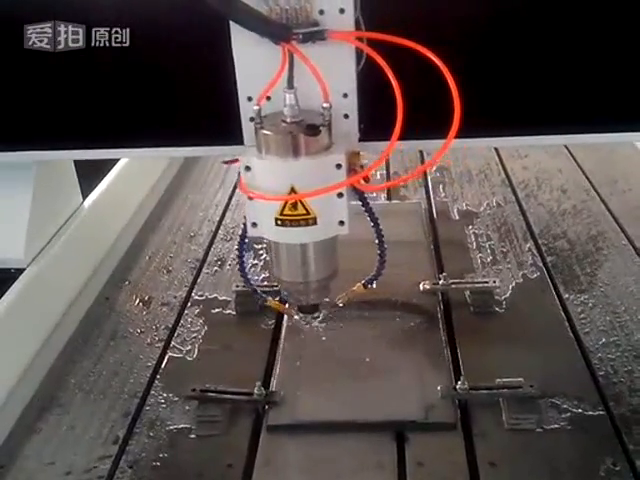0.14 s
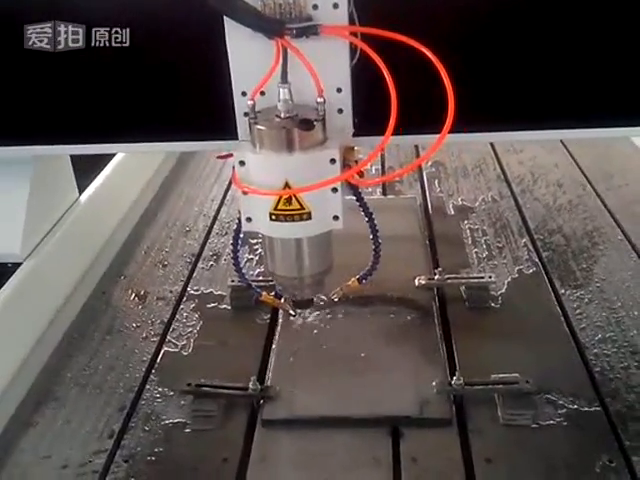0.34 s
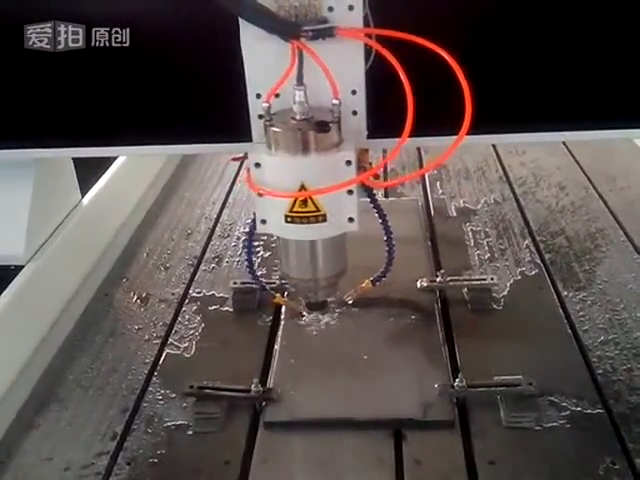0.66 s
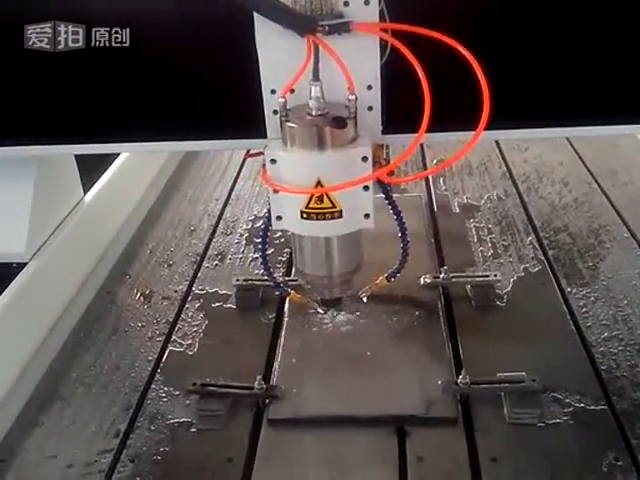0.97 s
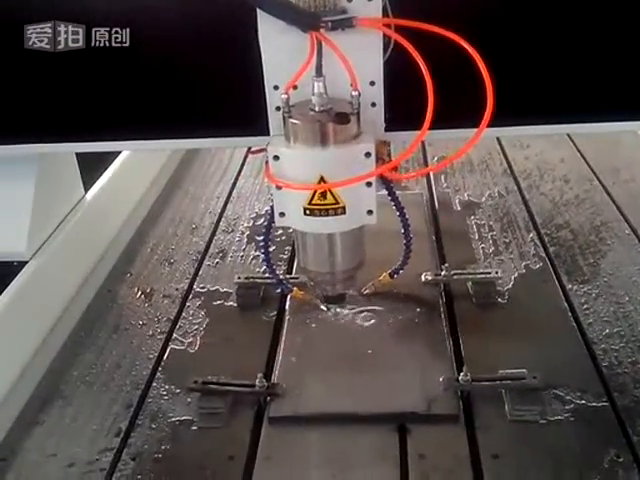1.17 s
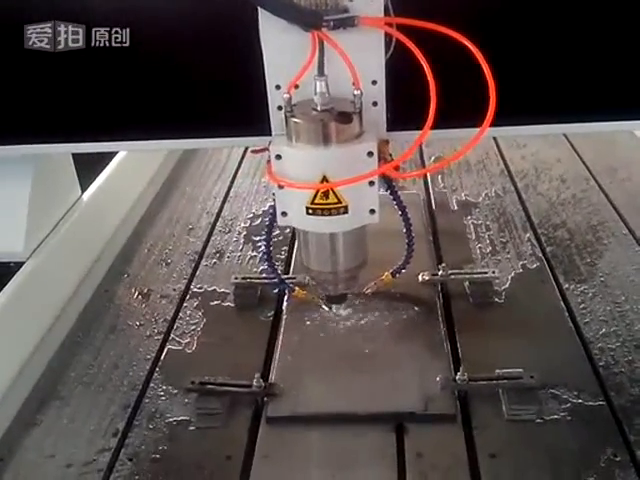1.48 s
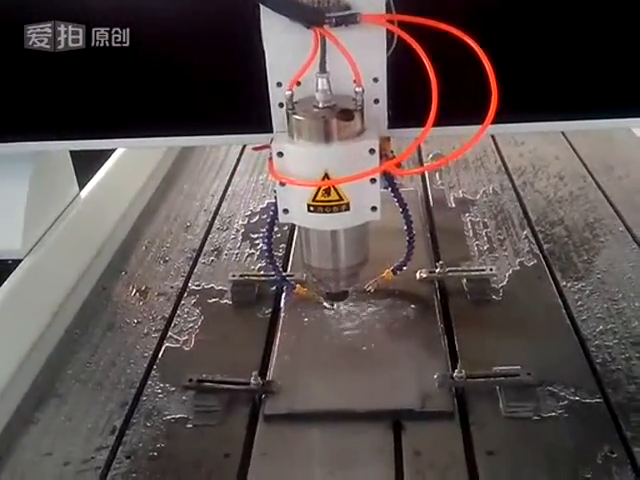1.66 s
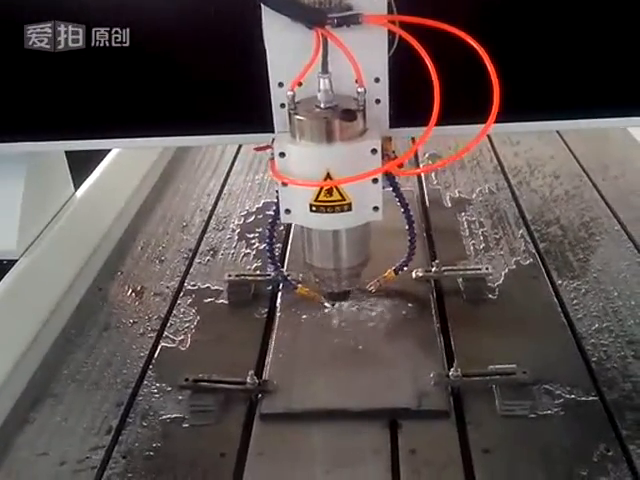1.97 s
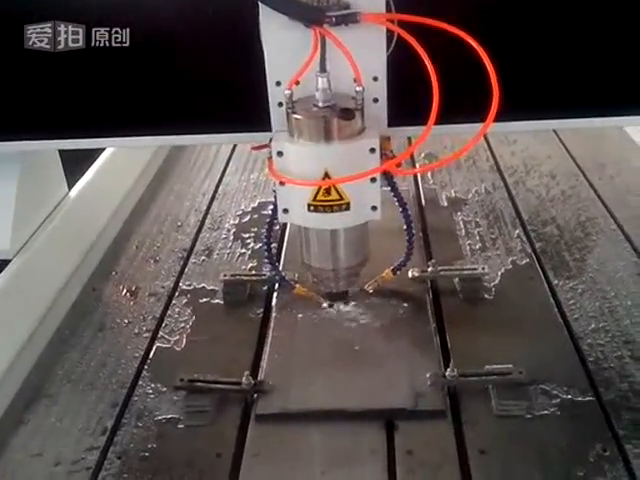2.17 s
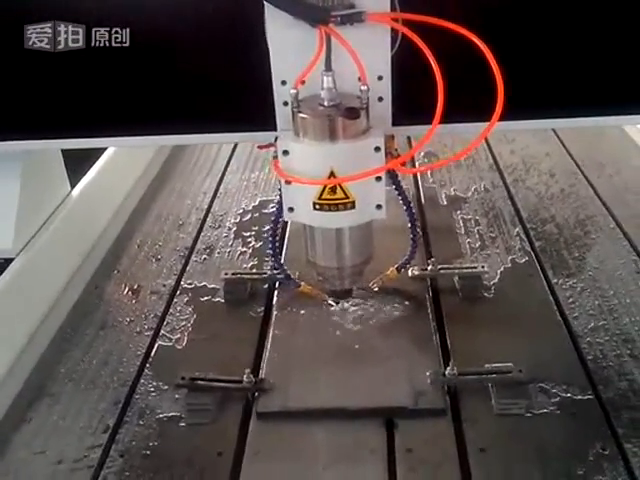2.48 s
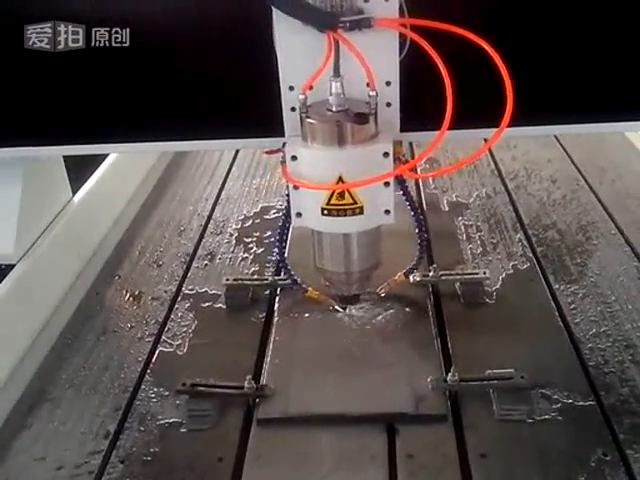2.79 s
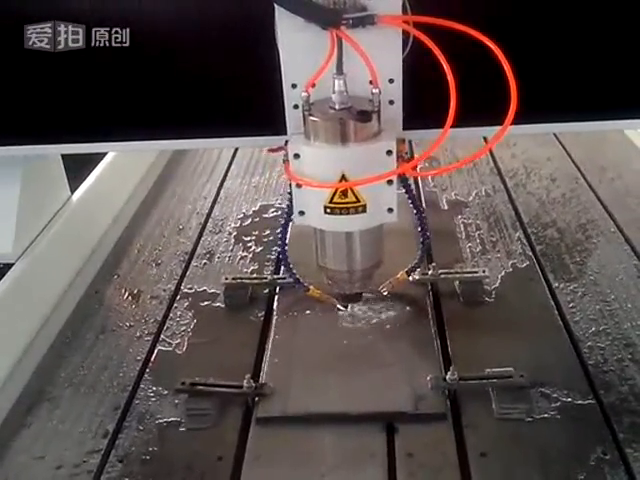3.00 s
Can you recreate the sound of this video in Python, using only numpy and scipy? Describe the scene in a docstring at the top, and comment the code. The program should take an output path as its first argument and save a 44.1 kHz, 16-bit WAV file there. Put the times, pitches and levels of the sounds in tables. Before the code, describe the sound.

A spinning machine bit hums and whines through wet stone, screeching briefly over hissing coolant.

```python
"""A router spindle turns about 300 times a second, grinding a wet stone slab in a workshop.
Its hum and whine are shaft orders that swell and fade as the head travels. The bit grinds
hardest once a turn and now and then catches and screeches.
Coolant jets hiss and a pump rumbles behind."""
import sys
import numpy as np
from scipy import signal
from scipy.fft import rfft, irfft, next_fast_len
from scipy.io import wavfile
from scipy.ndimage import uniform_filter1d, map_coordinates

SR = 44100
rng = np.random.default_rng(int(sys.argv[2]) if len(sys.argv) > 2 else 0)


def to_wav(sig):
    """Store sig (one row per channel, or 1-D mono) as 16-bit WAV at the path in sys.argv[1].

    Samples outside -1..1 are clipped; the rate is SR.
    """
    pcm = np.clip(np.atleast_2d(sig), -1, 1) * 32767
    pcm = np.round(pcm).astype(np.int16)
    wavfile.write(sys.argv[1], SR, pcm.T)  # frames by channels


N = 138474

SHAFT_HZ, FLUTTER_HZ = 299.85, 22
WANDER_RAD = 0.35  # phase drift, times sqrt(order)
HEAD_PAN_DB, LEFT_LAG_S = -3.5, 0.000233  # every pan is left minus right


def hum(shaft):
    """Shaft orders 1-7 swell, waver and drop out; the sixth swings sideways as the head travels."""
    # level of each order: t/s, level/dB
    order_1 = [(0.2, -26.5), (0.86, -29.5), (0.98, -26.5), (1.25, -26.5), (1.55, -33), (1.66, -44.5),
               (1.82, -29), (1.89, -35), (2.36, -30.5), (2.45, -25.5), (2.57, -27.5), (2.71, -42.5),
               (2.89, -23.5), (2.98, -30), (3.02, -42.5), (3.13, -27)]
    order_2 = [(0, -61), (.2, -40.5), (.39, -41.5), (.5, -60.5), (.79, -48), (.87, -35.5), (1.22, -35.5),
               (1.36, -54.5), (1.681, -46), (1.77, -57.5), (2.13, -42), (2.52, -41.5), (2.8, -51),
               (2.9, -45)]
    order_3 = [(0, -25.5), (.13, -33.5), (.23, -27.5), (.68, -30), (.725, -24.5), (.78, -31.5), (1.04, -26),
               (1.35, -30), (1.51, -37), (1.57, -32), (1.63, -43.5), (1.76, -25.5), (1.86, -37.5),
               (1.97, -28.5), (2.345, -29.5), (2.364, -39.5), (2.69, -46), (2.77, -32), (2.92, -46)]
    order_4 = [(0, -42), (.46, -33.5), (.66, -48), (1, -43.5), (1.4, -42.5), (1.66, -55.5), (1.74, -40),
               (2.3, -43.5), (2.6, -32), (2.7, -40.5)]
    order_5 = [(0.76, -47.5), (1.12, -36.5), (1.75, -52.5), (2.35, -51.5), (2.4, -38), (2.5, -33),
               (2.56, -49)]
    order_6 = [(0.01, -27), (.07, -45), (.17, -30), (.62, -31.5), (.79, -38), (.86, -28.5), (1.101, -30.5),
               (1.45, -33), (1.63, -36), (1.77, -32), (1.85, -39), (1.96, -29.5), (2.25, -36.5),
               (2.47, -24), (2.659, -32), (2.78, -26.5), (2.87, -30.5)]
    order_7 = [(0, -50.5), (.29, -30), (.36, -33), (.74, -38), (.8, -54), (1, -37), (1.3, -35.5),
               (1.67, -44.5), (2.7, -44), (2.77, -34.5), (2.83, -42)]
    # direction of each order: pan/dB, left lag/rad
    places = [(-4, 0.13), (-4, 0.97), (-13, 1.34), (-9.5, 1.4), (21, 1.4), (-5.5, 2.62), (10, 0.7)]
    # swing of order 6: t/s, added pan/dB
    swing = [(.75, 1), (.87, -16), (1.1, 0.5), (1.6, 2.5), (1.77, -12), (1.9, 7), (2.35, -6.5), (2.6, 18),
             (2.72, -4), (3, 5)]
    # brief dips: t/s, order
    dropouts = [(.645, 3), (.79, 6), (.905, 3), (1.71, 6), (2.065, 3), (2.57, 2), (2.73, 4)]
    trim_db, dip_db, dip_s, flutter_depth = 0.5, 11.5, 0.015, 0.075
    out, t = np.zeros((2, N)), np.arange(N) / SR
    levels = [order_1, order_2, order_3, order_4, order_5, order_6, order_7]
    for k, (level, (pan_db, lag_rad)) in enumerate(zip(levels, places), 1):
        dips = sum(np.exp(-((t - at_s) / dip_s) ** 2) for at_s, order in dropouts if order == k)
        flutter = 1 + flutter_depth * np.sqrt(k) * (wobble(FLUTTER_HZ) + 1j * wobble(FLUTTER_HZ))
        gain = amp(curve(level) + trim_db - dip_db * dips) * np.abs(flutter)
        phase = k * shaft + rng.uniform(0, 2 * np.pi) + np.angle(flutter)
        phase += WANDER_RAD * np.sqrt(k) * wobble(1.994)
        swing_db = curve(swing) * (k == 6)
        out += gain * pan(pan_db + swing_db) * np.sqrt(2) * np.cos([phase - lag_rad, phase])
    return out


def whine(shaft):
    """Shaft orders 8-24, each swelling and blurring on its own; now and then one sings out."""
    # common envelope: t/s, level/dB
    level = [(0, -43.5), (.4, -37.5), (.8, -46), (1.3, -35.5), (1.52, -45.5), (2.25, -44.5), (2.45, -32.5),
             (2.65, -44.5)]
    # spectrum: f/Hz, level/dB
    colour = [(2400, -5), (2700, -11), (4200, 2.5), (5500, -5), (6600, 3)]
    # orders that sing out: start/s, end/s, order, level/dB
    singing = [(.15, .7, 8, -44), (.24, .6, 16, -41), (.9, 1.46, 12, -41.5), (.98, 1.46, 15, -39)]
    trim_db, flutter_db, blur_rad, ramp_s = -7.5, 2, 0.25, 0.033
    out, t = np.zeros((2, N)), np.arange(N) / SR
    for k in range(8, 25):
        hz = k * SHAFT_HZ
        phase = k * shaft + rng.uniform(0, 2 * np.pi) + blur_rad * wobble(40)
        phase += WANDER_RAD * np.sqrt(k) * wobble(2)
        gain = amp(curve(level) + along(colour, hz) + trim_db)
        for start_s, end_s, order, db in singing:
            if order == k:
                gain += amp(db) * np.clip(np.minimum(t - start_s, end_s - t) / ramp_s, 0, 1)
        gain *= amp(flutter_db * wobble(FLUTTER_HZ))
        out += gain * np.cos([phase - 2 * np.pi * hz * LEFT_LAG_S, phase])
    return out * pan(HEAD_PAN_DB)


def grinding(shaft):
    """Gritty noise and the narrow ringing of head and bit, all following the load."""
    # how hard the bit grinds: t/s, level/dB
    load = [(0.06, -33), (0.29, -26), (0.81, -30.5), (1.35, -27.5), (1.59, -32), (2.3, -30), (2.47, -27),
            (2.66, -35.5), (2.71, -30)]
    # grit spectrum: f/Hz, relative density/dB
    spectrum = [(400, -8.5), (750, -7), (950, 5.5), (1100, -2.5), (1350, 1.5), (1620, -3), (1800, -7),
                (2060, 6), (2280, -3), (2750, -8), (3400, -7), (4300, 3), (5500, -9), (7000, -5.5)]
    # grit direction: f/Hz, pan/dB
    direction = [(800, -1.5), (1500, 6), (2200, 0), (3000, -13)]
    # head and bit resonances: f/Hz, width/Hz, relative level/dB
    rings = [(1815, 68, -11.5), (4215, 43, -12)]
    trim_db = -1
    grit = patchy(noise(lambda hz: amp(along(spectrum, hz)), lambda hz: along(direction, hz)))
    out = grit * bite(shaft, depth=0.43, grit_db=2) * amp(trim_db)
    for ring_hz, width_hz, db in rings:
        out += amp(db) * noise(resonance(ring_hz, width_hz), lambda hz: HEAD_PAN_DB)
    return out * amp(curve(load))


def screeches(shaft):
    """Each catch swells in one resonance, struck again every turn and so split into shaft orders."""
    # catches of the bit: peak t/s, length/s, level/dB, f/Hz, width/Hz
    catches = [(0.298, 0.12, -30, 4010, 482), (0.53, 0.12, -30.5, 4660, 330),
               (.695, 0.066, -30.5, 4410, 282), (0.748, 0.04, -24.5, 6760, 246),
               (0.743, 0.054, -33.5, 4940, 217), (0.908, .06, -24, 4400, 433),
               (0.98, 0.06, -24.5, 4460, 325), (1.324, 0.18, -29.5, 7080, 442),
               (1.334, 0.036, -29, 4430, 1320), (1.666, 0.06, -32, 4230, 220), (2.347, .11, -22, 5150, 750),
               (2.379, 0.053, -24.5, 4370, 410), (2.465, 0.16, -26.5, 5100, 602),
               (2.611, 0.045, -26, 6640, 697), (2.697, .075, -25, 4220, 130),
               (3.026, 0.023, -27.5, 6950, 362)]
    # direction by pitch: f/Hz, pan/dB
    direction = [(4600, -13), (5200, -2.5)]
    turn_echo = 0.78  # share repeated on the next turn
    out, t = np.zeros((2, N)), np.arange(N) / SR
    for peak_s, length_s, db, pitch_hz, width_hz in catches:
        near = np.abs(t - peak_s) < 2 * length_s
        swell = amp(db) / np.cosh(2 * (t[near] - peak_s) / length_s) ** 2
        mode = resonance(pitch_hz, width_hz)
        comb = lambda hz: mode(hz) / np.abs(1 - turn_echo * np.exp(2j * np.pi * hz / SHAFT_HZ))
        ring = noise(comb, lambda hz: along(direction, pitch_hz), size=max(near.sum(), SR // 8))
        out[:, near] += swell * ring[:, :near.sum()]
    return out * bite(shaft, depth=0.27, grit_db=-2)


def bite(shaft, depth, grit_db):
    """Contact of bit and stone: strongest once a turn, uneven from grain to grain."""
    return unit((1 + depth * np.cos(shaft)) * amp(grit_db * wobble(500)))


def coolant(level_db=-33.5, pan_db=-6):
    """Water jets fizz on the spinning bit."""
    # spray spectrum: f/Hz, relative density/dB
    spectrum = [(2600, -15.5), (4300, -2.5), (6100, 2.5), (6800, 8.5), (7400, -3)]
    hiss = patchy(noise(lambda hz: amp(along(spectrum, hz)), lambda hz: pan_db))
    return hiss * amp(level_db + wobble(29.97))


def pump(waver_db=2.4, pan_db=-4):
    """Low rumble of the pump and the machine bed."""
    # rumble envelope: t/s, level/dB
    level = [(0, -36.5), (.16, -45.5), (1.4, -47), (1.55, -43)]
    # rumble spectrum: f/Hz, relative density/dB
    spectrum = [(50, -31), (108, -2), (300, 2), (450, -6.5), (900, -29.5)]
    rumble = noise(lambda hz: amp(along(spectrum, hz)), lambda hz: pan_db)
    return rumble * amp(curve(level) + waver_db * wobble(14))


def amp(db):
    """Decibels to gain."""
    return 10 ** (np.asarray(db) / 20)


def unit(x):
    """Scale to rms 1."""
    return x / np.sqrt(np.mean(x ** 2) + 1e-20)


def along(points, hz):
    """Interpolate (f/Hz, value) points on a log axis."""
    knots_hz, values = np.transpose(points)
    return np.interp(np.log(hz + 1), np.log(knots_hz + 1), values)


def curve(points):
    """Interpolate (t/s, value) points at every sample."""
    return np.interp(np.arange(N) / SR, *np.transpose(points))


def wobble(rate_hz):
    """Smooth random curve, rate_hz knots a second."""
    steps = np.arange(0, N * rate_hz / SR + 1, 1 / 10)
    smooth = map_coordinates(rng.standard_normal(int(steps[-1]) + 2), [steps], order=2)
    return np.interp(np.arange(N) * rate_hz / SR, steps, smooth)


def pan(db):
    """Left and right gains of mean power 1."""
    gains = amp(np.array([[.5], [-.5]]) * db)
    return gains / np.sqrt(np.mean(gains ** 2, axis=0))


def resonance(centre_hz, width_hz):
    """Gain of a resonance with steep skirts."""
    return lambda hz: 1 / (1 + 2 * ((hz - centre_hz) / width_hz) ** 2)


def noise(gain, pan_db, size=N):
    """Stereo noise of rms 1, coloured by gain(hz) and placed by pan_db(hz)."""
    # left-right likeness: f/Hz, coherence
    coherence = [(300, 0.96), (900, 0.62), (2000, 0.087)]
    n_fft = next_fast_len(size, True)
    hz = np.fft.rfftfreq(n_fft, 1 / SR)
    mid, side = rfft(rng.standard_normal((2, n_fft)))
    spread_rad = np.arccos(np.clip(along(coherence, hz), -1, 1)) / 2
    mid, side = mid * np.cos(spread_rad), side * np.sin(spread_rad)
    pair = np.array([(mid + side) * np.exp(-2j * np.pi * hz * LEFT_LAG_S), mid - side])
    return unit(irfft(pair * gain(hz) * pan(pan_db(hz)), n_fft)[:, :size])


def patchy(x, depth_db=2.6):
    """Narrow bands of a noise swell and fade on their own."""
    bands = signal.stft(x, nperseg=1024)[2]
    patches = uniform_filter1d(rng.standard_normal(bands.shape[1:]), size=2, axis=0)
    patches = uniform_filter1d(patches, size=12, axis=1)
    bands *= amp(depth_db * unit(patches))
    return unit(signal.istft(bands, nperseg=1024)[1][:, :N])


def filtered(x, gain):
    """Zero-phase filter of response gain(hz)."""
    n_fft = next_fast_len(N + SR // 4, True)
    return irfft(rfft(x, n_fft) * gain(np.fft.rfftfreq(n_fft, 1 / SR)), n_fft)[:, :N]


def scene():
    """One shaft angle drives all the cutting sounds."""
    jitter_rad = 0.044
    shaft = 2 * np.pi * SHAFT_HZ * np.arange(N) / SR + jitter_rad * wobble(60)
    return hum(shaft) + whine(shaft) + grinding(shaft) + screeches(shaft) + coolant() + pump()


def record(dry):
    """Narrow-band recorder: the top of its band is faintly mirrored above half its sample rate."""
    # microphone response: f/Hz, gain/dB
    mic = [(35, -17.5), (95, -0.5), (7350, 0), (7800, -21.5), (7950, -57.5)]
    # mirror image response: f/Hz, gain/dB
    leak = [(8850, -10.5), (9700, -33.5)]
    rate_hz, top_hz = 16000, 9900
    band = filtered(dry, lambda hz: amp(along(mic, hz)))
    mirror = 2 * band * np.cos(2 * np.pi * rate_hz * np.arange(N) / SR)
    mirror = filtered(mirror, lambda hz: amp(along(leak, hz)))
    return filtered(band + mirror, lambda hz: hz < top_hz)


dry = scene()
out = record(dry)
to_wav(out)
```